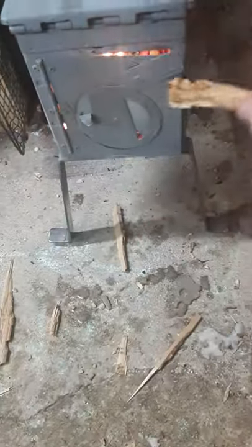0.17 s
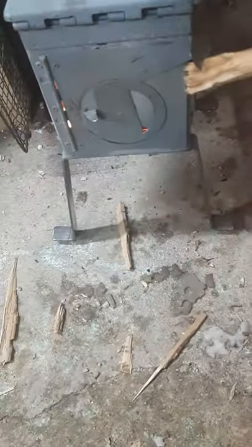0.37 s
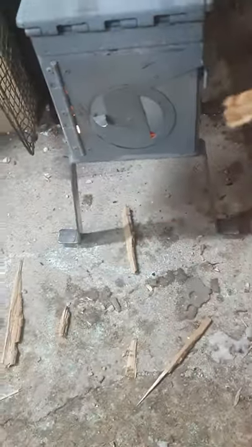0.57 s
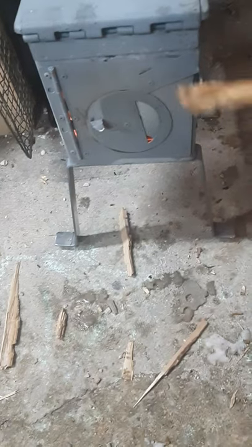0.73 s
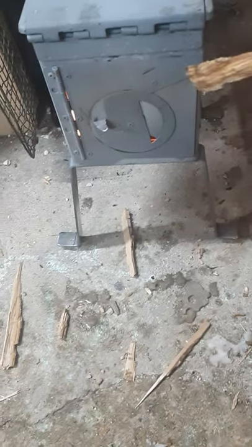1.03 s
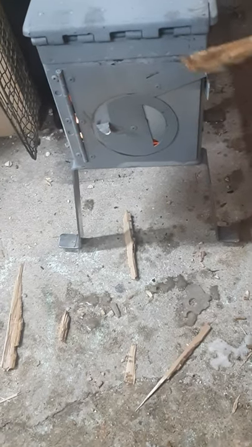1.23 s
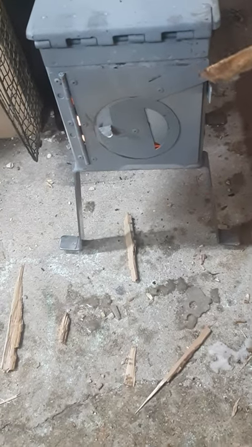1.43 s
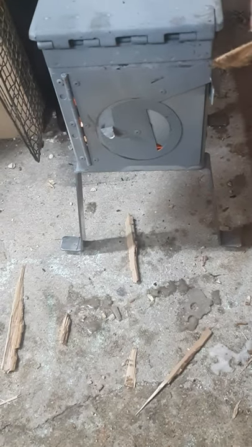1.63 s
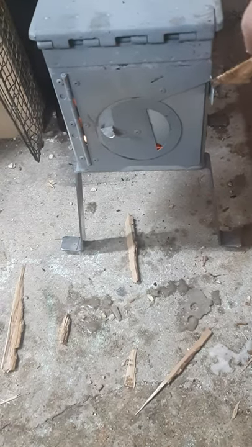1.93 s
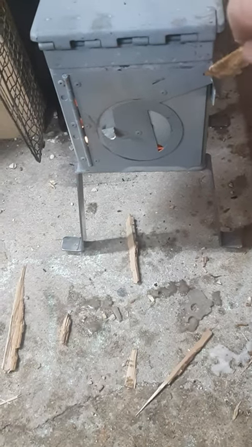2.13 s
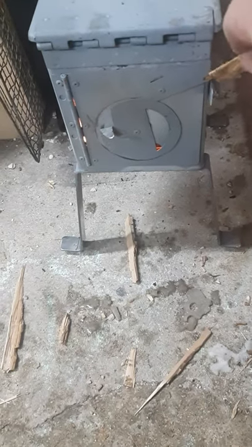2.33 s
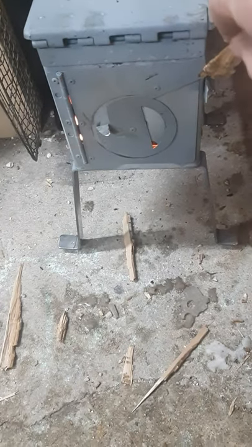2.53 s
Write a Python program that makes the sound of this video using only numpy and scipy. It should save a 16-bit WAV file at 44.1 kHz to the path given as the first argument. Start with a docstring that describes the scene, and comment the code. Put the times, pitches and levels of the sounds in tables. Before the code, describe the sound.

Close up in a small echoing workshop, a stove's metal door squeaks and slams with a ringing clank and a few rattles, the fire's hiss dulls, then soft wood knocks and short scratchy scrapes follow among crackles and deep puffs.

```python
"""A fire rushes, hisses and snaps; then a small stove's sheet-steel door squeals, clanks shut and settles.
The squeal is a gliding tone with a rasp in the hinge; each clank is steel ringing plus bursts of noise.
A split stick knocks on the door the same way, then scrapes along its latch as clicks and noise.
The fire is fluttering low noise, hiss, sharp snaps and, after the door has shut, short deep puffs.
A small hard workshop echoes the squeal, the scrapes and the ticking embers."""
import sys
import numpy as np
from scipy import signal
from scipy.fft import rfft, irfft, next_fast_len
from scipy.io import wavfile
from scipy.ndimage import map_coordinates

SR = 44100
rng = np.random.default_rng(int(sys.argv[2]) if len(sys.argv) > 2 else 0)


def wav_out(sig):
    """Save sig, one row per channel (or a flat mono array), as 16-bit PCM at SR to the path in sys.argv[1]."""
    wavfile.write(sys.argv[1], SR, np.round(np.clip(np.atleast_2d(sig).T, -1, 1) * 32767).astype(np.int16))


N = 119070
T = np.arange(N) / SR  # time in seconds
PORT_LAG_S = .00018  # sound reaches the left microphone port this much sooner


def amp(db):
    """Turn decibels into a plain multiplier."""
    return 10 ** (np.asarray(db) / 20)


def unit(x):
    """Scale a sound to an average (rms) strength of 1."""
    return x / np.sqrt(np.mean(x ** 2) + 1e-20)


def curve(rows, axis=1):
    """Join one column of a table with straight lines in time."""
    return np.interp(T, np.array(rows)[:, 0], np.array(rows)[:, axis])


def over_hz(rows, size, axis=1):
    """Join one column of a table with straight lines over log frequency."""
    rows = np.array(rows)
    log_hz = np.log(np.fft.rfftfreq(size, 1 / SR) + 1)
    return np.interp(log_hz, np.log(rows[:, 0]), rows[:, axis])


def colour(x, spectrum):
    """Filter a sound by a spectrum, then scale it to strength 1."""
    size = next_fast_len(x.shape[-1], True)
    filtered = irfft(rfft(x, size) * amp(over_hz(spectrum, size)), size)
    return unit(filtered[..., :x.shape[-1]])


# how alike left and right are, and which is louder: pitch_hz, likeness (correlation), left_minus_right_db
PORTS = [(59, 0.9, 1.5), (170, 1, -2), (324, 0.63, -4), (650, 0.78, 6.5), (1300, 0, -0.5), (4040, 0, 4.9),
         (8000, 0, -2.5), (16200, 0, 7)]


def noise(spectrum, size):
    """Noise arriving from all around at two microphone ports: partly shared, the left one sooner."""
    mid, side = rfft(rng.standard_normal((2, size)))
    sign = np.array([[1], [-1]])  # left, right
    like = np.clip(over_hz(PORTS, size), -.99, .99)
    both = mid * np.sqrt(1 + like) + sign * side * np.sqrt(1 - like)
    balance = amp(sign * over_hz(PORTS, size, axis=2) / 2)
    lag = np.exp(sign * 1j * np.pi * np.fft.rfftfreq(size, 1 / SR) * PORT_LAG_S)
    return unit(irfft(both * balance * lag * amp(over_hz(spectrum, size)), size))


def fade(t, t60):
    """Die away by 60 dB in t60 seconds."""
    return np.exp(-np.log(1000) * t / t60)


def walk(points_per_s):
    """A smooth random wander through chance points with a spread near 1."""
    points = rng.standard_normal(1024)
    return map_coordinates(points, [T * points_per_s], mode="wrap")


def grains(per_s, spread_db):
    """Random clicks of uneven size."""
    hits = rng.random(N) < per_s / SR
    size_db = spread_db * np.minimum(rng.exponential(size=N), 4)
    return hits * rng.choice([-1, 1], N) * amp(size_db)


def add(out, start, x):
    """Mix a sound in from its start time in seconds."""
    i = max(int(start * SR), 0)
    out[:, i:i + x.shape[-1]] += x[..., :N - i]


def echo_through(x, response):
    """Let every instant of a sound set off the same two-channel response."""
    return signal.fftconvolve(x[None], response, axes=1)[:, :N]


ROOM_T60_S = 0.31


def room(x):
    """Many wall reflections merge into a dense fading echo, about as strong as the sound feeding it."""
    t = T[:SR // 2]
    flat = [(20, 0), (20000, 0)]
    echo = noise(flat, len(t)) * fade(t, ROOM_T60_S) * (t > .003)  # silent for the first 3 ms
    return echo_through(x, echo / np.sqrt(np.sum(echo ** 2) / 2))


def steel_ring(modes, t):
    """Steel rings at several pitches at once; higher ones reach the two ports further out of step."""
    out = 0
    for hz, db, t60 in modes:
        phase = 2 * np.pi * rng.random() - np.array([[0], [min(hz / 500, 1.7)]])
        out = out + amp(db) * np.sin(2 * np.pi * hz * t + phase) * fade(t, t60)
    return out


# hinge squeal over time: start_s, pitch_hz (centre of the jitter), tone_db, octave_db, rasp_db
SQUEAL = [(.131, 977, -67, -85, -83), (.139, 935, -40, -56, -52.5), (.148, 897, -33.5, -46, -39.5),
          (.157, 877, -42.5, -55, -47.5), (.172, 868, -26.5, -52, -42), (.182, 850, -31, -46.5, -38),
          (.196, 848, -42, -47, -39.5), (.21, 854, -38.5, -47, -47.5), (.226, 840, -61, -59, -63),
          (.238, 885, -38.5, -64, -56), (.256, 880, -68, -70, -61)]
# overtones of the squeal: multiple_of_pitch, level_db (against the octave)
OVERTONES = [(2, 3), (3, -7), (4, -13)]
# upper spectrum of the rasp: pitch_hz, level_db
RASP = [(710, -50), (1200, -10.5), (1570, -18.5), (1730, -6), (2400, -13.5), (3740, -14), (5130, -10),
        (8350, -32.5), (11100, -24.5), (16000, -35)]
# ring of the door while it swings free: pitch_hz, level_db, t60_s
SWINGING_DOOR = [(174, 3, 0.26), (272, -3.5, 0.39), (574, -4.5, 0.33), (1079, -5, 0.73), (1740, -8, 0.27),
                 (1980, -6, 0.18), (2232, -3, 0.2), (3330, -17, .2), (3580, 4.5, 0.13), (5200, -14, .15)]
PITCH_JITTER, JITTER_POINTS_PER_S = .012, 250  # jitter as a share of the pitch
SQUEAL_ROOM_DB, SQUEAL_LEFT_MINUS_RIGHT_DB = -12, 6
RASP_DB, RASP_ROOM_DB, DOOR_BODY_DB = -0.5, 3, 2


def hinge():
    """The dry hinge sticks and slips: a gliding tone, and a rasp once a cycle that shakes the door."""
    pitch_hz = curve(SQUEAL) * (1 + PITCH_JITTER * walk(JITTER_POINTS_PER_S))
    phase = 2 * np.pi * np.cumsum(pitch_hz) / SR
    on = (T > SQUEAL[0][0]) & (T < SQUEAL[-1][0])

    overtones = sum(amp(db) * np.sin(round(k) * phase) for k, db in OVERTONES)
    tone = amp(curve(SQUEAL, axis=2)) * np.sin(phase) + amp(curve(SQUEAL, axis=3)) * overtones
    tone = on * np.sqrt(2) * tone  # a sine of peak root 2 has strength 1

    # one uneven click per cycle, plus noise that swells once per cycle
    slips = np.diff(phase // (2 * np.pi), prepend=0) * (1 + .5 * rng.standard_normal(N))
    grit = 0.48 * unit(slips) + rng.standard_normal(N) * (1 + np.cos(phase))
    force = on * amp(curve(SQUEAL, axis=4))
    rasp = force * colour(grit, [(200, -16.5), (900, -17)] + RASP)

    ring = steel_ring(SWINGING_DOOR, T[:SR // 2])
    body = echo_through(force * grit, ring / np.sqrt(np.sum(ring ** 2)))

    balance = amp(np.array([[1], [-1]]) * SQUEAL_LEFT_MINUS_RIGHT_DB / 2)
    squeal = tone * balance + amp(SQUEAL_ROOM_DB) * room(tone)
    return squeal + amp(RASP_DB) * rasp + amp(RASP_ROOM_DB) * room(rasp) + amp(DOOR_BODY_DB) * body


# ring of the stove's plates: pitch_hz, level_db, t60_s
PLATES = [(175.2, -15, 0.37), (226.2, -1, 0.42), (261.8, 4.5, 0.19), (399, -8, 0.15), (471.7, 0.5, 0.27),
          (515.7, -9, 0.4), (558, -12.5, 0.42), (878, -18, 0.56), (950, -11.5, .3), (1079, -9, 0.33),
          (1744, -28.5, 1), (1810, -12.5, 0.26), (2182, -12, 0.21), (2333, -46.5, 0.43), (3190, -14, 0.22),
          (3940, -19, 0.41), (4530, -20.5, 0.3), (5130, -16, 0.37)]
# low thud of a blow: pitch_hz, level_db
THUD = [(30, -62), (90, -22), (140, -5), (200, -1), (260, 1.5), (330, -6.5), (600, -30), (2000, -66)]
# middle clank of a blow: pitch_hz, level_db
CLANK = [(150, -13), (330, 0), (470, -3.5), (700, -6), (950, -1), (1300, -12), (2200, -11.5), (5000, -29.5),
         (16000, -47)]
THUD_T60_S, CLANK_T60_S, CRACK_T60_S = 0.29, 0.32, 0.19
TAIL_DB, TAIL_T60_S = -13, 0.2  # the room's weaker fade behind each burst


def blows(rows, crack):
    """A blow rings the plates, and its thud, clank and crack are noise for ringing too dense to tell apart."""
    out, t = np.zeros((2, N)), T[:SR * 2 // 3]
    for start, contact, ring_db, thud_db, clank_db, crack_db in rows:
        blow = amp(ring_db) * steel_ring(PLATES, t)
        bursts = ((THUD, thud_db, THUD_T60_S), (CLANK, clank_db, CLANK_T60_S),
                  (crack, crack_db, CRACK_T60_S))
        for spectrum, db, t60 in bursts:
            shape = np.hypot(fade(t, t60), amp(TAIL_DB) * fade(t, TAIL_T60_S))
            blow = blow + amp(db) * noise(spectrum, len(t)) * shape
        onset = np.minimum(t / max(contact, 1 / SR), 1)  # a longer contact starts more softly
        add(out, start, blow * onset)
    return out


# door meets frame: start_s, contact_s, ring_db, thud_db, clank_db, crack_db
DOOR_BLOWS = [(.270, 0.005, -37.5, -57, -39, -74), (.2975, 0.00067, -36.5, -38.5, -33, -28.5),
              (.411, 0.011, -43.5, -39, -55, -48), (.464, 0.017, -43.5, -52, -42, -54),
              (.493, 0.006, -42, -62, -36, -44), (.511, 0.0029, -45, -51, -46.5, -50),
              (.597, 0.0071, -50, -42, -58.5, -75)]
# bright crack of steel on steel: pitch_hz, level_db
DOOR_CRACK = [(400, -18), (1200, -4.5), (2200, 0), (5000, -0.5), (6600, -4.5), (7700, -18), (9800, -7),
              (12500, -11.5), (15600, -12.5)]


def door():
    """The door clanks against its frame and settles in weaker blows."""
    return blows(DOOR_BLOWS, DOOR_CRACK)


# stick meets door: start_s, contact_s, ring_db, thud_db, clank_db, crack_db
STICK_BLOWS = [(.8645, 0.0087, -44.5, -46, -47, -38.5), (1.072, 0.019, -42.5, -41.5, -48, -49),
               (1.08, 0.0082, -54, -57.5, -48.5, -71), (1.555, 0.015, -51.5, -90, -53.5, -46),
               (1.618, 0.009, -50.5, -50, -55, -60), (1.891, 0.019, -46.5, -51, -55, -45.5),
               (2.24, 0.013, -46, -43, -47.5, -69), (2.393, 0.0098, -54.5, -45, -50, -79)]
# bright crack of wood on steel: pitch_hz, level_db
STICK_CRACK = [(400, -68), (1200, -14), (2100, 1), (2700, -6.5), (4600, 2.5), (6600, -1.5), (7600, -11.5),
               (10000, -10), (12500, -12), (15600, -9)]


def stick():
    """The split stick knocks on the shut door and sets the same steel ringing."""
    return blows(STICK_BLOWS, STICK_CRACK)


# slides of wood on steel: start_s, rise_s, hold_s, level_db
SCRAPES = [(1.053, 0.048, 0.029, -61), (1.39, 0.011, 0.013, -69), (1.751, 0.0063, 0.038, -70),
           (2.123, 0.017, 0.061, -69.5), (2.221, 0.0069, 0.029, -59.5), (2.245, 0.0064, 0.016, -55),
           (2.274, 0.0033, 0.019, -44.5), (2.326, .003, 0.033, -48), (2.372, .015, 0.015, -52),
           (2.488, 0.0014, .016, -51), (2.527, 0.0036, .016, -50.5), (2.55, 0.0077, 0.017, -70),
           (2.601, 0.0035, 0.0082, -56.5)]
# spectrum of a scrape: pitch_hz, level_db
SCRAPE = [(290, -42), (500, -14), (530, -13), (613, -15), (960, -7.5), (1180, -14), (2010, -4), (2570, -10),
          (5020, -3.5), (6510, -11.5), (7860, -30), (8960, -20), (16000, -35.5)]
RELEASE_S, SCRAPE_ROOM_DB = 0.0089, -2  # release: time to fall to about a third
CATCH_POINTS_PER_S, CATCH_DB = 110, 2.5  # pace and spread of the uneven grip


def scrapes():
    """Wood fibres catch on the steel in short, uneven slides."""
    push = 0
    for start, rise, hold, db in SCRAPES:
        rising = np.clip((T - start) / rise, 0, 1)
        letting_go = np.exp(-np.maximum(T - start - rise - hold, 0) / RELEASE_S)
        push = push + amp(db) * rising * letting_go
    spectrum = [(100, -15)] + SCRAPE
    fibres = colour(grains(per_s=1200, spread_db=2.5), spectrum)
    texture = amp(-6.5) * fibres + amp(-1.5) * noise(spectrum, N)
    rub = push * amp(CATCH_DB * walk(CATCH_POINTS_PER_S)) * texture
    return rub + amp(SCRAPE_ROOM_DB) * room(rub[0])


# snaps of the fire: start_s, level_db, lift_db (change of the top octave)
SNAPS = [(0.0367, -51.5, -4), (0.269, -35, -10), (0.4273, -44.5, 20), (.836, -58.5, -6), (1.043, -60.5, -1),
         (1.245, -62, 7), (1.3227, -57, -1), (1.531, -53, 12), (1.538, -45.5, 4), (1.856, -49, 2.5),
         (1.985, -53, 9), (2.013, -32.5, 5.5), (2.066, -50.5, 7), (2.130, -56.5, -3), (2.292, -49, 7),
         (2.33, -44, -10), (2.607, -46.5, 11)]
# spectrum of a snap before the lift: pitch_hz, level_db
SNAP = [(500, -23), (2500, -10.5), (4500, 4.5), (6500, 0.5), (8000, -6.5), (12000, -5), (15600, 2.5)]
TICK_DB, TICK_T60_S = 11, .003
SNAP_RING_DB, SNAP_RING_T60_S = -12.5, .015
WASH_DB, WASH_T60_S = -8, .21
SNAP_LOW_HZ = 2940  # the snaps are thinned below this


def snaps():
    """Burning wood snaps: a sharp tick, a short ring and a longer wash, all treble noise."""
    out, t = np.zeros((2, N)), T[:SR // 4]
    tick = amp(TICK_DB) * fade(t, TICK_T60_S)
    ring = amp(SNAP_RING_DB) * fade(t, SNAP_RING_T60_S)
    wash = amp(WASH_DB) * fade(t, WASH_T60_S)
    for start, db, lift_db in SNAPS:
        # the lift grows from 7500 Hz to its full size an octave higher
        spectrum = [(hz, level + lift_db * np.clip(np.log2(hz / 7500), 0, 1)) for hz, level in SNAP]
        add(out, start, amp(db) * noise(spectrum, len(t)) * (tick + ring + wash))
    return signal.sosfilt(signal.butter(2, SNAP_LOW_HZ, "high", fs=SR, output="sos"), out)


# puffs of flame in the firebox: centre_s, level_db
PUFFS = [(.612, -33.5), (0.729, -39), (1.225, -38), (1.407, -34), (1.683, -37), (1.854, -41),
         (2.052, -32.5), (2.07, -38), (2.14, -32), (2.213, -34.5), (2.409, -36.5), (2.422, -42),
         (2.446, -41)]
PUFF_HZ, PUFF_S = 157, 0.0059  # puff_s: from its peak down to about a third


def puffs():
    """A flare of gas pushes one or two low cycles out of the firebox."""
    both = T + np.array([[PORT_LAG_S], [0]])  # left hears it sooner
    out = 0
    for centre, db in PUFFS:
        wave = np.cos(2 * np.pi * (PUFF_HZ * (both - centre) + rng.random()))
        out = out + amp(db) * wave * np.exp(-((both - centre) / PUFF_S) ** 2)
    return out


# strength of the draught through the stove: start_s, level_db
DRAUGHT = [(0, -46), (.15, -52.5), (.45, -46.5), (.8, -52.5), (1.1, -48), (1.45, -46), (1.8, -46),
           (2.15, -45), (2.33, -53.5), (2.55, -52.5), (2.7, -59.5)]
# firebox resonances that the flames excite: pitch_hz, level_db
ROAR = [(25, -3), (45, -31.5), (65, -10.5), (92, -15), (125, -4.5), (148, -3.5), (170, 3), (197, -15),
        (231, -2), (264, -1.5), (300, -15.5), (350, -22), (410, -16.5), (440, -26), (473, -14), (530, -32),
        (700, -28.5), (800, -35.5), (915, -22.5), (1170, -48.5), (3000, -51)]
# strength of the embers' sizzle, quieter once the door has shut: start_s, level_db
SIZZLE = [(0, -50), (.25, -56.5), (.45, -51), (.65, -65.5), (1.5, -64), (2.7, -63.5)]
# spectrum of the sizzle: pitch_hz, level_db
EMBERS = [(300, -12), (1000, -2), (2500, -8.5), (4000, -7), (5200, -1.5), (7500, -18.5), (10000, -11),
          (13000, -16), (15600, -0.5)]
FLUTTER_POINTS_PER_S, FLUTTER_DB = 45, 1.5  # pace and spread of the flutter


def fire():
    """Flames flutter in the draught as low noise; the embers hiss and tick."""
    draught_db = curve(DRAUGHT) + FLUTTER_DB * walk(FLUTTER_POINTS_PER_S)
    roar = noise(ROAR + [(6000, -110)], N) * amp(draught_db)
    ticks = colour(grains(per_s=180, spread_db=4.5), EMBERS)
    hiss = amp(1) * noise(EMBERS, N)
    ticking = amp(-8) * (.5 * ticks + room(ticks))
    return roar + amp(curve(SIZZLE)) * (hiss + ticking)


def scene():
    """All the sources together, from the squealing hinge to the fire behind it."""
    return hinge() + door() + stick() + scrapes() + snaps() + puffs() + fire()


def record(dry):
    """The recorder thins the deep bass and cuts the top."""
    thin = signal.sosfilt(signal.butter(2, 45, "high", fs=SR, output="sos"), dry)
    return signal.sosfilt(signal.ellip(10, .2, 70, 15900, fs=SR, output="sos"), thin)  # top in Hz


dry = scene()
out = record(dry)
wav_out(out)
```